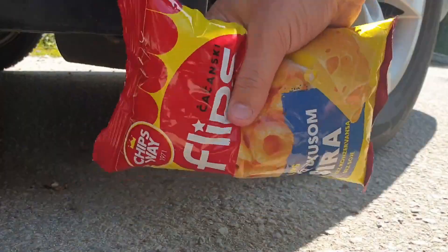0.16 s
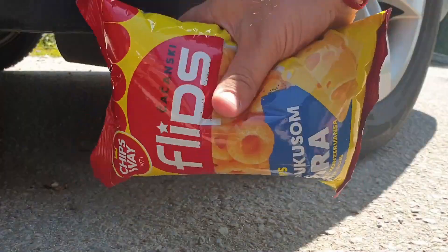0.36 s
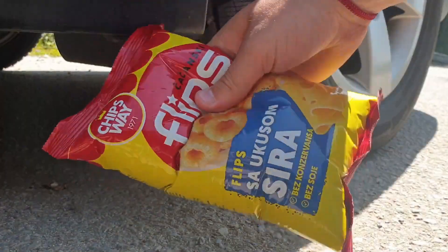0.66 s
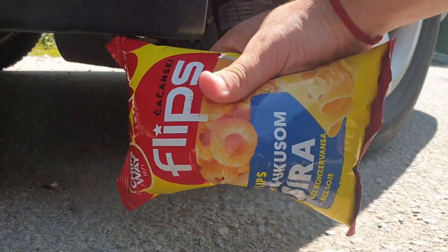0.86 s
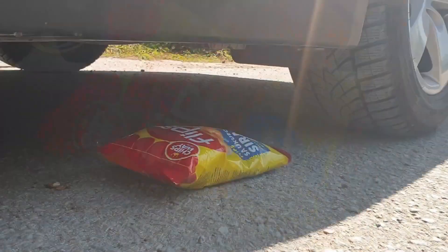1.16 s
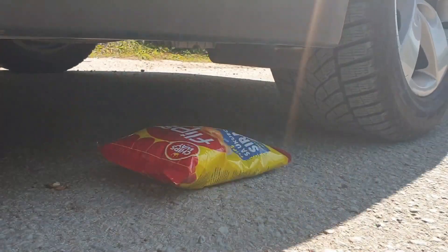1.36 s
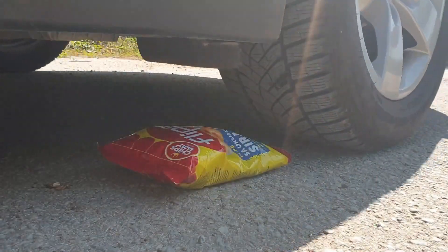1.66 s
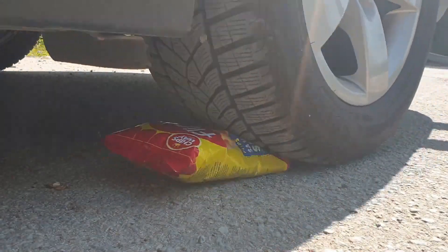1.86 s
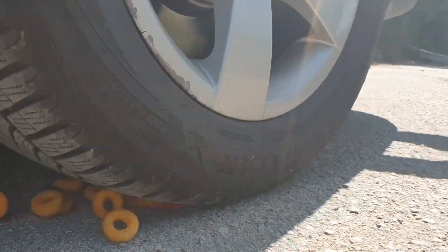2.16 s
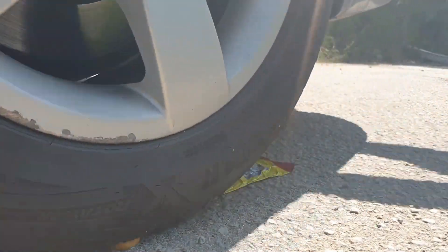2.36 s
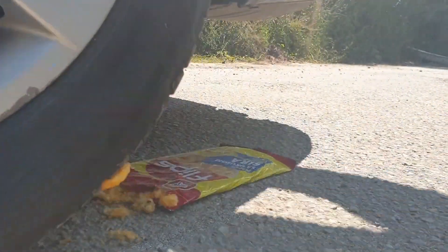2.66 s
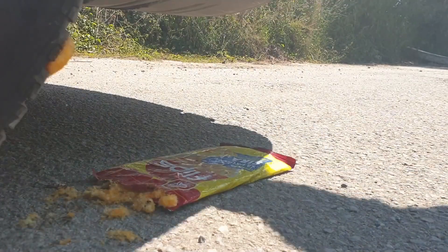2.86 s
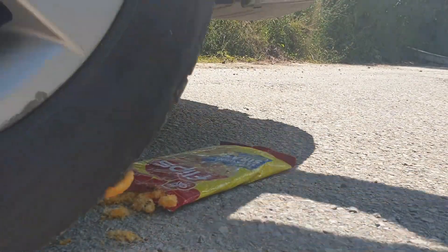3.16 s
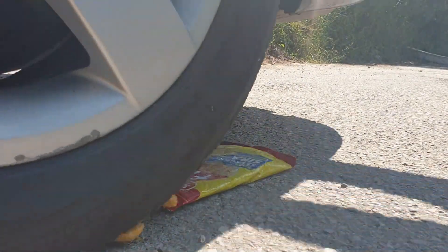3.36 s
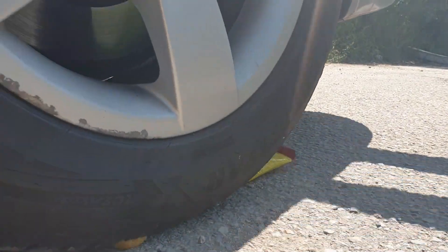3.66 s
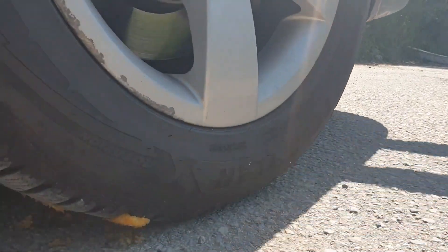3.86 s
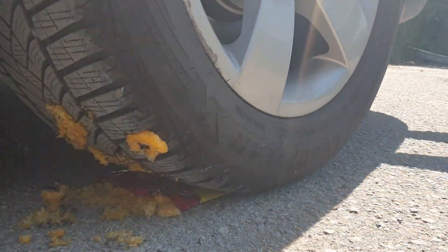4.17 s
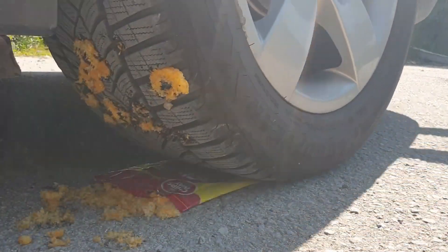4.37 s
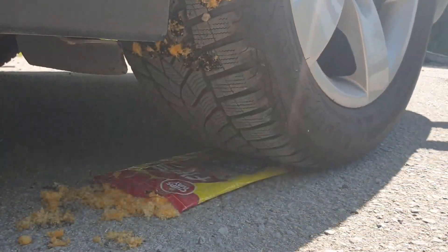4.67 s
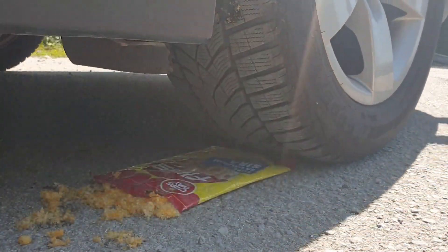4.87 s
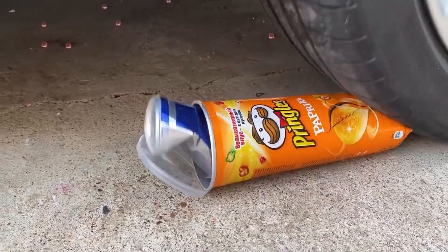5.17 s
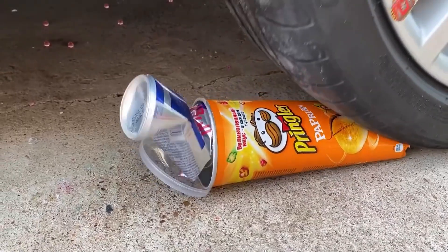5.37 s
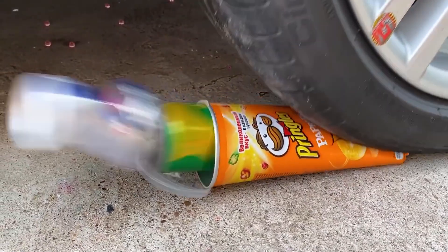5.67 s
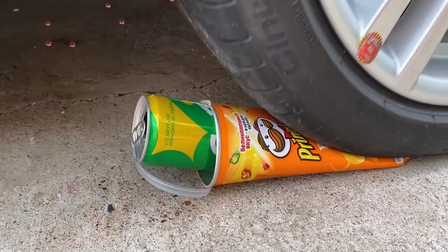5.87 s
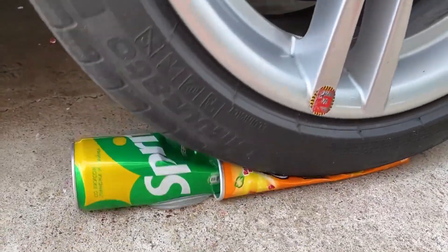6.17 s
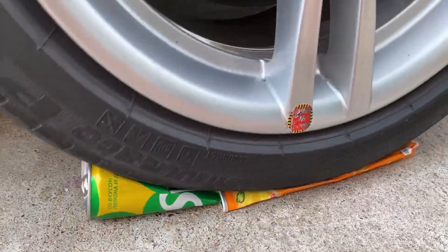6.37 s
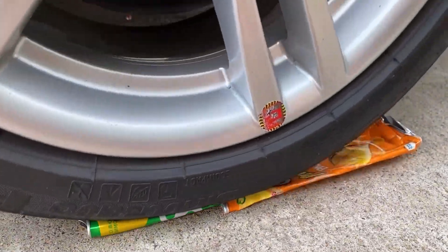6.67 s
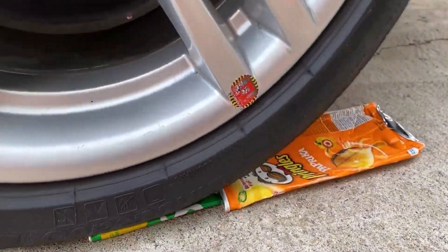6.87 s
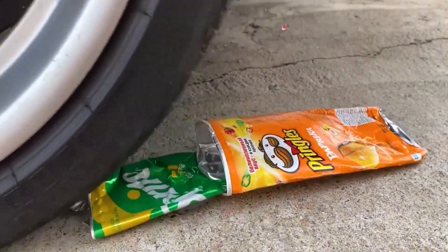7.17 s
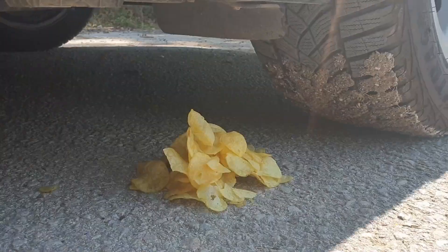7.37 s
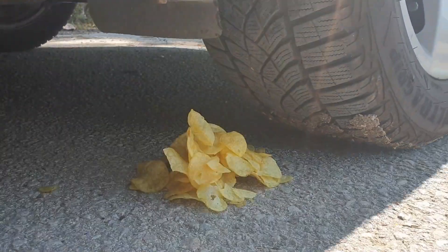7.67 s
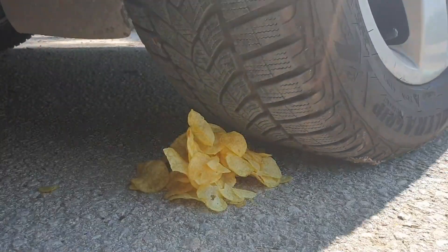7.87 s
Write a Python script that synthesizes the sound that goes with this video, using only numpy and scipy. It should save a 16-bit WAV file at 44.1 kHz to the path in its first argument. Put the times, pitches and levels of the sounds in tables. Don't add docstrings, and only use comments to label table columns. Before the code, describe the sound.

A chain of crushing sounds at a roadside, miked very near the wheel. Dense low-pitched glass grit first, then busy foil crackle, a short wait, and a rushing pop as a snack bag bursts. Quiet rustles lead to a second crunch ending in a heavy knock. Tiny silences mark scene changes. A narrower mono section brings hollow cardboard cracks, a slowed deep thud and bright tinny can folding; last, sparse brittle crisps ticks in wide stereo.

```python
import sys
import numpy as np
from scipy import signal
from scipy.fft import rfft, irfft, next_fast_len
from scipy.io import wavfile
from scipy.ndimage import uniform_filter1d, minimum_filter1d

SR = 44100
rng = np.random.default_rng(int(sys.argv[2]) if len(sys.argv) > 2 else 0)


def generate_wav(signal):
    frames = np.transpose(np.atleast_2d(signal))
    scaled = np.clip(frames, -1, 1) * 32767
    pcm = np.round(scaled).astype(np.int16)
    wavfile.write(sys.argv[1], SR, pcm)


def volts_from_db(level):
    exponent = np.asarray(level, float) / 20
    return 10 ** exponent


N = 353998
T = np.arange(N) / SR

# [t/s, level/dB]
RUMBLE = [(0, -39.5), (.17, -47), (1.1, -46), (1.46, -44), (1.93, -45.5), (2.45, -59.5), (2.7, -65.5),
          (3.2, -56.5), (3.9, -47), (4.2, -65.5), (4.98, -75.5), (5.01, -27.5), (5.13, -28), (5.42, -34),
          (6.7, -42), (7.3, -37.5), (7.41, -53.5), (8.03, -41.5)]
# [from t/s, to t/s]
SILENCES = [
    (.146, .176),
    (4.983, 5.012),
    (7.379, 7.41),
]
# [t/s, level/dB]
GLASS_EFFORT = [(0.0, -30.5), (0.136, -38), (0.15, -56.5)]
HAND_EFFORT = [(0.17, -46), (0.218, -38), (0.914, -34), (1.042, -31.5), (1.2, -42.5), (1.333, -48.5),
               (1.75, -52.5), (1.94, -63)]
BAG_EFFORT = [
    [(1.94, -63), (1.958, -34), (1.995, -17.5), (2.031, -16), (2.056, -36.5), (2.11, -30), (2.4, -34),
     (2.69, -66), (2.83, -64.5)],
    [(2.99, -58.5), (3.38, -53.5), (3.68, -30.5), (3.84, -33.5), (4.01, -35.5), (4.05, -52), (4.16, -52),
     (4.77, -66), (4.99, -68.5)],
]
CANS_EFFORT = [
    [(5.01, -49), (5.068, -49), (5.131, -49), (5.227, -46.5), (5.385, -58)],
    [(6.02, -52), (6.133, -29.5), (6.27, -43), (6.723, -47.5), (6.95, -61), (7.299, -55), (7.39, -67)],
]
SLOWED_EFFORT = [(5.36, -39.5), (5.402, -47), (5.655, -39), (5.69, -17), (5.75, -28), (5.92, -58),
                 (5.954, -43.5), (6.014, -63), (6.04, -58)]
CRISPS_EFFORT = [(7.41, -45.5), (7.536, -56.5), (7.99, -48), (8.027, -33.5)]
# [t/s, left over right level/dB]
DIRECTION = [(1.1, 1.5), (1.3, 6), (1.9, 6.5), (2.0, 1.5), (2.4, 2.5), (7.4, 4.5), (8.0, 4.5)]
# [t/s, rise level/dB, half length/s]
SURGES = [(0.279, 14.5, 0.031), (0.362, 8.5, 0.025), (.43, 11, 0.025), (0.568, 13.5, 0.029),
          (0.623, 9, 0.024), (.745, 11, 0.019), (0.835, 12, 0.029), (0.899, 14.5, 0.022), (1.1, 13, 0.027),
          (1.306, 8.5, 0.035), (1.711, 16, 0.04), (2.55, 7.5, 0.027), (2.74, 16, 0.036), (2.91, 13, 0.037),
          (3.91, 9, 0.029), (7.958, 8.5, 0.048), (7.735, 5.5, 0.012), (1.77, 4.5, 0.025)]
# [t/s, rise level/dB, half length/s]
HISSES = [(6.26, -13, .014), (1.249, -10.5, 0.014), (1.602, -9.5, 0.02), (7.56, 9, .008), (2.972, -7, .012),
          (3.25, 22, 0.022), (5.156, 14.5, 0.017), (5.215, 15.5, 0.014), (5.334, 8.5, .015),
          (6.215, 10, 0.027), (6.348, 13.5, 0.028), (6.732, 13, 0.011), (6.844, 19, 0.03),
          (7.172, 17.5, 0.031), (7.3, 8, 0.011)]
# [t/s, rise level/dB, half length/s]
PUSHES = [(1.024, 9, 0.22), (1.553, 12, 0.014), (1.965, 6.5, 0.037), (2.916, 9, 0.062), (3.145, 8, 0.039),
          (3.276, 12, 0.076), (3.467, 6, 0.12), (5.564, 9.5, 0.056), (7.525, 10.5, 0.02)]
# [t/s, peak level/dB, body level/dB, ring f/Hz]
HAND_SNAPS = [(0.1788, -20.5, -10, 1580), (0.19, 3, -22.5, 397), (0.1952, -9, -2.5, 1880),
              (0.2153, -11.5, -13.5, 2180), (0.2529, -16, -5, 424), (0.3592, -13.5, -20, 1940),
              (0.4229, -14.5, -3.5, 413), (0.4918, -12.5, -10.5, 1930), (0.551, -12, -12, 446),
              (0.569, -15.5, -15, 1800), (0.62, -6, -7, 2470), (0.6442, -14.5, -1.5, 2370),
              (0.6833, -13, -6.5, 2500), (0.7225, -13.5, -3, 2060), (0.7498, -16.5, -12, 480),
              (0.808, -17.5, -4, 457), (0.84, -15, -13.5, 2300), (0.871, -18, -18, 2300),
              (0.8748, -12, -4.5, 1980), (0.967, -20.5, -14, 2040), (0.985, -20.5, -18, 2040),
              (1.0294, -9, -2, 867), (1.079, -19, -30, 2000), (1.086, -14, -4.5, 460),
              (1.0943, -12.5, -13.5, 457), (1.1434, -11.5, -10.5, 480), (1.2012, -16, -13.5, 1250),
              (1.269, -32, -4, 1900), (1.372, -30, -30, 2000), (1.4327, -15, -46, 1950),
              (1.51, -20, -5.5, 2380), (1.54, -25, -12.5, 2500), (1.5577, -20, -1.5, 1860),
              (1.629, -29.5, -28, 748), (1.802, -31, -3, 332), (1.8987, -31.5, 0, 415)]
BAG_SNAPS = [(3.035, -44, -12, 1800), (3.128, -46, 0, 1100), (3.244, -32, -6, 2250),
             (3.6482, -12, -4.5, 913), (3.8635, -13.5, -8.5, 633), (3.9108, -6.5, -7, 820),
             (3.9974, -18.5, 8.5, 1053), (4.482, -49, -1, 1056), (4.5721, -39, -1.5, 1084),
             (4.6537, -46, -3, 1190), (4.8291, -41, -13.5, 1200)]
TUBE_SNAPS = [(5.1386, -11, -1.5, 600), (5.1499, -15, 3.5, 1920), (5.161, -19, -2, 1300),
              (5.1778, -13.5, -3, 2000), (5.1886, -24, 13, 988), (5.205, -11, -2, 1014),
              (5.259, -23, -2.5, 973), (5.3121, -21.5, -20, 500), (5.327, -18, -7.5, 1090)]
SLOWED_SNAPS = [(5.541, -29, 12, 570), (5.56, -25, 9, 293), (5.6255, -18, 8, 397), (5.6722, -18, 9, 383),
                (5.6957, -8.5, -7, 1260), (5.9455, -24, -3, 596)]
CAN_SNAPS = [(6.0364, -31, -8, 626), (6.1239, -6.5, -2.5, 1706), (6.1412, -23.5, 10, 580),
             (6.167, -8.5, 1, 445), (6.177, -9, -5, 895), (6.19, -16, 9.5, 1550), (6.204, -12, 6, 542),
             (6.237, -15, 1, 473), (6.288, -5.5, -5.5, 1095), (6.2967, -16, 1, 1114),
             (6.3265, -17.5, -16, 1055), (6.331, -9, 7.5, 650), (6.3338, -8, 3, 5000),
             (6.369, -7, -8, 1124), (6.407, -26, 7, 470), (6.4469, -23.5, 7, 700), (6.4516, -12, -8, 2000),
             (6.465, -19, -3, 2380), (6.526, -22.5, 4, 2360), (6.5067, -9.5, -9, 873),
             (6.543, -20, 5.5, 815), (6.5535, -7.5, -13, 2420), (6.5643, -8.5, 2.5, 447),
             (6.6148, -31, -6, 620), (6.659, -12, -35, 2400), (6.6722, -24.5, -19, 1920),
              (6.7013, -17, -35, 1300), (6.7598, -22, -4, 1620), (6.8183, -12.5, -7.5, 1700),
              (6.811, -24.5, -30, 2000), (6.833, -17, -27, 770), (6.8383, -13, -28, 2280),
              (6.865, -18, -20, 2300), (6.885, -24.5, -9, 1610), (6.986, -20, -3, 687),
              (7.0417, -32.5, -1, 915), (7.0572, -34.5, -5, 1500), (7.1061, -38, 6, 1000),
              (7.1628, -4.5, -13, 910), (7.23, -29.5, -0.5, 860), (7.289, -22.5, 0, 910)]
CRISPS_SNAPS = [(7.4121, -33.5, 6, 1740), (7.441, -9.5, -11.5, 3000), (7.502, -29.5, 4.5, 790),
                (7.6112, -32, 0, 1240), (7.66, -28, -35, 1570), (7.7064, -40.5, 8, 1130),
                (7.802, -32, -3, 1190), (7.838, -33, -15, 1500), (7.925, -22, -29, 1200),
                (7.957, -30, 9, 1240), (7.967, -23.5, -2, 890), (8.006, -24.5, -5, 3000),
                (8.014, -19.5, 4, 1900)]
# [f/Hz, level/dB per Hz]
GLASS_COLOUR = [(15, -29.5), (25, 8), (295, -3), (468, -8), (2770, -8.5), (3560, -9.5), (5280, -6),
                (5790, -13), (6200, -64.5), (8060, -104)]
FOIL_COLOUR = [(15, -46), (25, -3), (55, 13.5), (338, -3.5), (432, 1), (1390, -3.5), (2030, 1.5),
               (15300, -9), (16400, -34)]
BAG_COLOUR = [(15, -45.5), (25, -10.5), (420, -6), (469, -6.5), (829, -4), (1390, -5), (11200, -15),
              (15100, -18.5), (16400, -49.5)]
CANS_COLOUR = [(15, -30), (25, 0.5), (70, 4), (770, -3), (957, -3), (3000, -10.5), (5030, -10.5),
               (8440, -19), (10200, -14.5), (12000, -29), (14500, -14.5), (16700, -55.5)]
SLOWED_COLOUR = [(15, -37.5), (25, 0), (220, -9.5), (376, -15), (564, -13), (2530, -31), (2960, -41),
                 (3540, -40.5), (4630, -45), (5300, -100), (6890, -116)]
CRISPS_COLOUR = [(15, -30), (25, -8), (70, -9.5), (398, -8.5), (785, -6), (2450, -10), (3050, -10.5),
                 (10900, -20.5), (16400, -24.5)]
# [f/Hz, width f/Hz,
# depth 0-1]
MONO_DIPS = [(75.4, 17, -1.5), (3370, 640, 0.42), (8580, 520, 0.54), (11960, 330, 0.85)]
# [f/Hz, width f/Hz, depth 0-1]
SLOWED_DIPS = [(2080, 690, 0.78), (3000, 270, 0.88), (3990, 180, 0.92)]
GLASS_DIPS = [(2470, 177, 0.58), (3600, 320, 0.83), (4740, 190, 0.73)]
# [f/Hz, width f/Hz, depth 0-1, below 0 = hump]
HUM = [(62.4, 27, -0.62)]
# [f/Hz, likeness 0-1]
ALIKE = [(100, 0.65), (700, 0.32), (3000, 0.052)]
# [f/Hz, level/dB, t60/s]
WHEEL_MODES = [(198, -9, 0.12), (130, -11.5, .14), (570, -9.5, .11), (667, 5, 0.058), (820, -5.5, 0.1),
               (976, -5, 0.07), (1240, -9, 0.087)]
# [t/s, knock level/dB, thump level/dB, thump f/Hz, thump left over right level/dB, cavity level/dB]
BLOWS = [
    (2.03, -36.5, -18, 61.1, 13, -42),
    (3.9977, -11, -7.5, 63.2, -8, -40),
]
# [t/s, level/dB, f/Hz]
THUDS = [
    (5.207, -20, 257),
    (5.717, -4, 72.4),
    (6.566, -8, 123),
]
# [t/s, length/s, rms level/dB, f/Hz, width f/Hz]
CAN_SCRAPES = [(5.015, 0.15, -44.5, 2240, 400), (5.138, 0.034, -27, 2230, 110),
               (5.157, 0.018, -21.5, 565, 90), (5.204, 0.01, -13.5, 310, 150), (5.204, .022, -19, 960, 70),
               (5.215, 0.068, -28, 248, 50), (5.325, 0.052, -35, 3240, 1500),
               (5.325, 0.05, -36.5, 1080, 60), (5.3, 0.061, -34, 248, 50), (5.45, 0.053, -31, 199, 100),
               (5.74, 0.099, -24.5, 218, 119), (5.69, 0.063, -22.5, 1350, 400),
               (5.95, 0.031, -35, 298, 201), (6.123, 0.024, -22, 1670, 130),
               (6.19, 0.035, -30.5, 2200, 500), (6.21, 0.032, -25.5, 800, 350),
               (6.275, 0.017, -30, 4700, 500), (6.29, 0.021, -25, 1000, 348),
               (6.34, 0.039, -27.5, 870, 350), (6.34, 0.024, -40, 4900, 900),
               (6.424, 0.0081, -30, 596, 200), (6.452, 0.044, -34, 2170, 500), (6.6, 0.14, -42.5, 219, 98),
               (6.625, 0.034, -39, 1190, 500), (6.81, .06, -41, 710, 300), (6.635, 0.016, -39.5, 4830, 800),
               (6.718, 0.023, -33.5, 4730, 500), (6.716, 0.025, -42, 2290, 500),
               (6.775, 0.031, -46, 4960, 900), (6.785, .025, -46, 2200, 500),
               (6.822, 0.047, -31, 4860, 800), (6.845, 0.03, -37, 2400, 450), (7.15, .012, -42, 3480, 1800),
               (7.168, 0.033, -39.5, 4800, 1000), (7.168, 0.031, -37.5, 1820, 700),
               (7.228, 0.027, -41, 840, 180), (7.305, 0.027, -39, 830, 180),
               (7.295, 0.03, -42.5, 2000, 800)]
# [t/s, length/s, rms level/dB, f/Hz, width f/Hz]
BAG_SCRAPES = [(.258, 0.035, -30, 2160, 700), (.262, 0.033, -34, 430, 199.6), (.42, 0.039, -37, 2500, 1200),
               (.555, 0.081, -32, 378, 200), (.58, 0.091, -39.5, 2500, 800), (.7, 0.024, -34.5, 2600, 400),
               (.81, 0.052, -37, 2500, 1000), (.878, 0.014, -32.5, 1910, 400),
               (1.03, 0.017, -24.5, 1110, 700), (1.268, 0.091, -44, 1600, 600),
               (1.75, 0.033, -42.5, 1500, 600), (1.8, 0.026, -35.5, 242, 101),
               (1.96, 0.039, -30, 352, 151.4), (1.99, 0.062, -24, 860, 400), (2.03, 0.038, -20.5, 278, 150),
               (2.03, 0.016, -22, 620, 120.7), (3.999, 0.028, -24, 400, 301), (3.06, 0.16, -60, 282, 120),
               (3.42, 0.12, -52, 220.4, 100), (7.41, 0.016, -38, 892, 500), (7.5, 0.04, -38, 780, 300),
               (7.962, 0.013, -34.5, 1240, 600), (8.014, .005, -18, 1800, 800)]
# [t/s, length/s, rms
# level/dB, f/Hz, width f/Hz]
RASPS = [(6.714, 0.031, -28.5, 10180, 808), (6.716, 0.021, -36.5, 14400, 900),
         (6.775, 0.023, -45, 14500, 893), (6.82, 0.04, -35.5, 14300, 999), (7.005, 0.013, -47, 9970, 1200),
         (7.166, .035, -37, 14300, 900), (7.166, .035, -42, 10300, 800), (5.015, 0.1, -45, 685, 248),
         (5.1875, 0.006, -13, 950, 160)]

# (body over crackle dB, body dB per crackle dB, body lag s, ground shake dB, snap t60 s)
GLASS_LAW, SLOWED_LAW = (-2, 0.77, 0.1, -13.5, .05), (4, 1, 0, -7.5, 0.01)
HAND_LAW, BAG_LAW = (-2, 0.56, -0.39, -17, 0.0326), (-5.5, 1.12, 0.003, -17, 0.055)
TUBE_LAW, CAN_LAW = (6, 0.5, -2.2, -6.5, 0.13), (0.47, 0.5, -0.025, -0.2, 0.0496)
CRISPS_LAW = (-1.5, 0.8, 0.14, -18, 0.035)
MIDDLE_DB = -40
CAVITY_HZ, CAVITY_T60 = (236, 224), .8
SIDES = np.array([[.5], [-.5]])


def along(points, hz):
    f, value = np.transpose(points)
    return np.interp(np.log(hz + 1), np.log(f + 1), value)


def causal(gain):
    cep = irfft(np.log(gain + 1e-6))
    half = len(cep) // 2
    cep[1:half] *= 2
    cep[half + 1:] = 0
    h = irfft(np.exp(rfft(cep)))[:half]
    return h / np.linalg.norm(h)


def ring(t, when, db, hz, t60, rise):
    age = np.maximum(t - when, 0)
    return volts_from_db(db - 60 * age / t60) * np.sin(2 * np.pi * hz * age) * (1 - np.exp(-age / rise))


def layers(t, flow, law):
    body_db, grows, lag, shake_db, _ = law

    def effort(at):
        return np.interp(at, *np.transpose(flow))

    body = volts_from_db(MIDDLE_DB + body_db + grows * (effort(t - lag) - MIDDLE_DB))
    rumble = volts_from_db(np.interp(t, *np.transpose(RUMBLE)))
    return [volts_from_db(effort(t)), body, np.hypot(body * volts_from_db(shake_db), rumble)]


def pushed_air():
    return sum(ring(T, s, db, hz, 8 / hz, 0.0024) for s, db, hz in THUDS)


def tyre():
    out = np.zeros((2, N))
    for s, knock_db, thump_db, thump_hz, pan, cavity_db in BLOWS:
        near = slice(round(s * SR), round(s * SR) + SR)
        t = T[near]
        for hz, db, t60 in WHEEL_MODES:
            out[:, near] += ring(t, s, knock_db + db + rng.normal(0, 2.3, (2, 1)), hz, t60, 0.00036)
        out[:, near] += ring(t, s, thump_db, thump_hz, 0.057, 0.0015) * volts_from_db(SIDES * pan)
        for k, hz in enumerate(CAVITY_HZ):
            out[:, near] += ring(t, s, cavity_db - 10 * k, hz, CAVITY_T60, 0.0067)
    return out


def scrapes(rows, stereo):
    edge, fade_db, rough_db = .25, -4.5, 5.5
    skirt_db, skirt_wider = -13.5, 4.4
    steady = .7
    lead = .02
    out, t = np.zeros((2, N + 8192)), T[:8192]
    hz_axis = np.fft.rfftfreq(len(t), 1 / SR)
    age = t - lead
    noises = rng.standard_normal((len(rows), 3, len(t)))
    for (s, length, db, hz, width), (a, b, slip) in zip(rows, noises):
        slip = uniform_filter1d(slip, size=45)
        narrow = np.exp(-((hz_axis - hz) / width) ** 2)
        broad = np.exp(-((hz_axis - hz) / (skirt_wider * width)) ** 2)
        env = np.clip(np.minimum(age, length - age) / (edge * length) + .5, 0, 1)
        env = env * volts_from_db(fade_db * age / length)
        turn = stereo * np.arccos(along(ALIKE, hz)) / 2
        pair = np.cos(turn) * a + np.sin(turn) * np.array([b, -b])
        core = irfft(rfft(pair) * narrow)
        core = core * (core.std() / (np.abs(signal.hilbert(core)) + core.std() / 10)) ** steady
        skirt = irfft(rfft(pair * volts_from_db(rough_db * slip / slip.std())) * broad)
        sound = irfft(rfft(env * (core + volts_from_db(skirt_db) * skirt)) * broad)
        sound = sound * np.sqrt(2 * length * SR / np.sum(sound ** 2))
        pan = stereo * np.interp(s, *np.transpose(DIRECTION)) * SIDES
        out[:, round((s - lead) * SR):][:, :len(t)] += volts_from_db(db + pan) * sound
    return out[:, :N]


def three_bands(spectrum, dips):
    hz = np.fft.rfftfreq(8192, 1 / SR)
    gain = volts_from_db(along(spectrum, hz))
    for centre_hz, width, depth in dips:
        gain = gain * (1 - depth * np.exp(-((hz - centre_hz) / width) ** 2))
    under_2000, under_150 = [1 / (1 + (hz / edge) ** 6) for edge in (2000, 150)]
    shares = [1 - under_2000, under_2000 - under_150, under_150]
    return [causal(gain * np.sqrt(np.abs(share))) for share in shares]


def mottled(n, patchy_db):
    z = signal.stft(rng.standard_normal((2, n + 256)), nperseg=256)[2]
    field = rng.standard_normal(z.shape[1:])
    for axis in (0, 1):
        field = uniform_filter1d(field, size=5, axis=axis)
    pair = signal.istft(z * volts_from_db(patchy_db * field / field.std()), nperseg=256)[1][:, :n]
    return pair / pair.std()


def grains(n, density, spread_db, life):
    chance, size = rng.random(n), rng.exponential(size=n)
    power = (chance < density / SR) * volts_from_db(2 * min(spread_db, 5) * np.minimum(size, 4))
    env = signal.lfilter([1], [1, -np.exp(-1 / (life * SR))], power)
    env = signal.lfilter([1], [1, -np.exp(-2 / (life * SR))], env[::-1])[::-1]
    return np.sqrt(env / env.mean())


def swell(t, rows):
    lift_db = 0
    for when, db, half in rows:
        if t[0] <= when < t[-1]:
            lift_db = lift_db + db * np.exp(-((t - when) / half) ** 2)
    return volts_from_db(lift_db)


def crush(flow, law, snaps, spectrum, dips, stereo, density, spread_db, life, bed, patchy_db, click_db, click_s):
    start, stop = round(flow[0][0] * SR), round(flow[-1][0] * SR)
    t = T[start:stop]
    crackle, body, ground = layers(t, flow, law)
    crackle = crackle * swell(t, SURGES + HISSES)
    body = body * swell(t, SURGES + PUSHES)
    pan = stereo * np.interp(t, *np.transpose(DIRECTION))
    busy = (1 - bed) * crackle / (crackle + volts_from_db(-41))
    texture = np.sqrt(1 - busy + busy * grains(len(t), density, spread_db, life) ** 2)
    sided = volts_from_db(SIDES * pan)
    drive = [crackle * texture * sided, body * np.sqrt(texture) * sided, ground * sided]
    out = np.zeros((2, N + SR // 8))
    build_up = .27 if stereo else .17
    hits = np.searchsorted(t, [row[0] for row in snaps if t[0] <= row[0] < t[-1]])
    for (when, db, body_db, hz), luck in zip(snaps, rng.standard_normal((len(snaps), 3))):
        if not t[0] <= when < t[-1]:
            continue
        near = slice(*np.searchsorted(t, [when - .06, when + .2]))
        age = t[near] - when
        t60 = law[-1] * volts_from_db(0.049 * (db + body_db / 2 + 18))
        size = volts_from_db(db + SIDES * pan[near])
        flutter = volts_from_db(-13 + 60 * np.minimum(age / (build_up * t60), -age / t60)) * np.sqrt(texture[near])
        click = volts_from_db(click_db + 60 * np.minimum(2 * age, -age) / click_s)
        burst = size * np.hypot(flutter, click)
        drive[0][:, near] = np.hypot(drive[0][:, near], burst)
        drive[1][:, near] = np.hypot(drive[1][:, near], burst * volts_from_db(body_db))
        for spacing, chance in zip([.84, 1, 1.27], luck):
            pitch = hz * spacing * (1 + 0.022 * chance)
            mode_db, mode_t60 = body_db - 10.5 + 2 * chance, min(0.91 * t60, 80 / pitch)
            out[:, start:stop][:, near] += size * ring(t[near], when, mode_db, pitch, mode_t60, life / 4)
    for env, h, (_, alike) in zip(drive, three_bands(spectrum, dips), ALIKE[::-1]):
        turn = stereo * np.arccos(alike) / 2
        a, b = mottled(len(t), patchy_db)
        pair = np.cos(turn) * a + 2 * SIDES * np.sin(turn) * b
        pair[:, hits] = 1.15
        sound = signal.fftconvolve(env * pair, h[None], axes=1)
        out[:, start:start + sound.shape[1]] += sound
    return out[:, :N]


def glass_shards():
    return crush(GLASS_EFFORT, GLASS_LAW, [], GLASS_COLOUR, GLASS_DIPS, False, density=2100, spread_db=0.0,
                 life=.003, bed=0.66, patchy_db=1.5, click_db=0, click_s=.01)


def shaken_bag():
    return crush(HAND_EFFORT, HAND_LAW, HAND_SNAPS, FOIL_COLOUR, HUM, True, density=1500, spread_db=9,
                 life=0.00094, bed=0.58, patchy_db=3.0, click_db=0.5, click_s=0.0033)


def burst_bag():
    return crush(np.concatenate(BAG_EFFORT), BAG_LAW, BAG_SNAPS, BAG_COLOUR, HUM, True, density=3400, spread_db=5,
                 life=0.0029, bed=1.0, patchy_db=2.5, click_db=-4.0, click_s=0.0056)


def tube_and_cans():
    snaps = [TUBE_SNAPS, CAN_SNAPS]
    return sum(crush(flow, law, rows, CANS_COLOUR, MONO_DIPS, False, density=640, spread_db=5, life=0.0013,
                     bed=0.22, patchy_db=3.5, click_db=-4.5, click_s=0.0079)
               for flow, law, rows in zip(CANS_EFFORT, [TUBE_LAW, CAN_LAW], snaps))


def slowed_tube():
    return crush(SLOWED_EFFORT, SLOWED_LAW, SLOWED_SNAPS, SLOWED_COLOUR, SLOWED_DIPS, False, density=600,
                 spread_db=5.5, life=0.0093, bed=1.0, patchy_db=2.0, click_db=-6.5, click_s=0.036)


def crisps_heap():
    return crush(CRISPS_EFFORT, CRISPS_LAW, CRISPS_SNAPS, CRISPS_COLOUR, HUM, True, density=480, spread_db=-2.5,
                 life=0.0011, bed=0.39, patchy_db=4.0, click_db=0.5, click_s=0.003)


def scene():
    crushed = glass_shards() + shaken_bag() + burst_bag() + tube_and_cans() + slowed_tube() + crisps_heap()
    dragged = scrapes(CAN_SCRAPES, False) + scrapes(BAG_SCRAPES, True) + scrapes(RASPS, False)
    shut = sum(np.clip(np.minimum(T - a, b - T) / .004, 0, 1) for a, b in SILENCES)
    return (pushed_air() + tyre() + dragged + crushed) * (1 - shut) ** 2


def low_pass(x):
    return signal.sosfilt(signal.butter(12, 16810, fs=SR, output="sos"), x)


def record(dry):
    needed = np.minimum(1, 1 / (np.abs(dry).max(axis=0) + 1e-9))
    held = dry * uniform_filter1d(minimum_filter1d(needed, size=257), size=257)
    m = next_fast_len(N)
    hz, spectrum = np.fft.rfftfreq(m, 1 / SR), rfft(held, m)
    low, wide = [irfft(spectrum * np.clip((top - hz) / 250 + .5, 0, 1), m)[:, :N] for top in (15900, 16800)]
    power = (np.gradient(low, axis=1) ** 2).sum(axis=0)
    click = uniform_filter1d(power, size=129) > 5 * uniform_filter1d(power, size=2049)
    opened = uniform_filter1d(1. - minimum_filter1d(1. - click, size=257), size=129)
    mix = low + (wide - low) / 4 * opened
    return low_pass(mix)


dry = scene()
out = record(dry)
generate_wav(out)
```